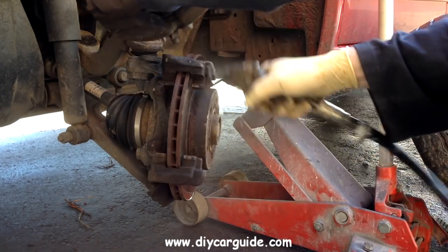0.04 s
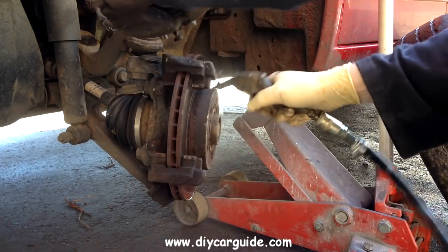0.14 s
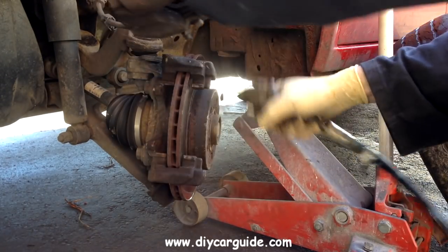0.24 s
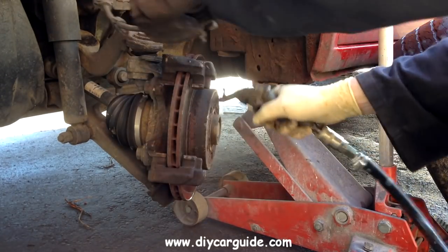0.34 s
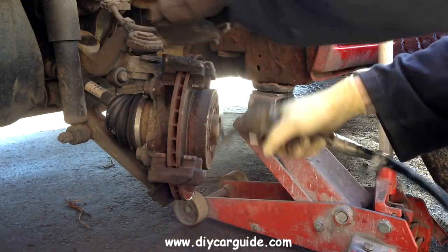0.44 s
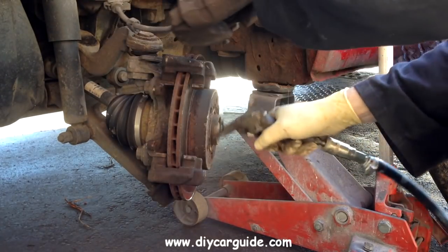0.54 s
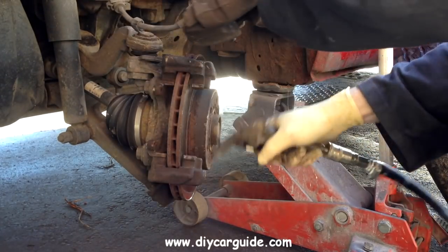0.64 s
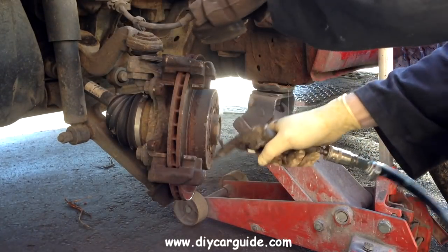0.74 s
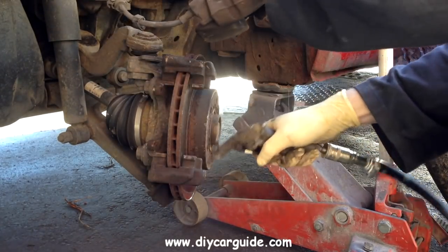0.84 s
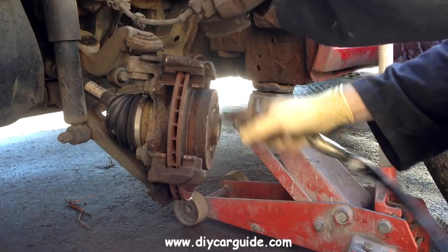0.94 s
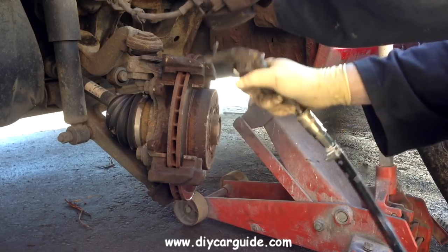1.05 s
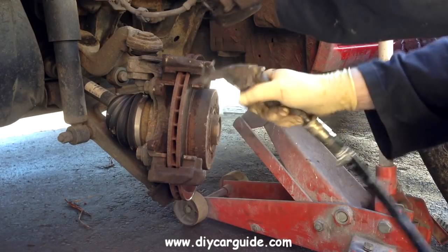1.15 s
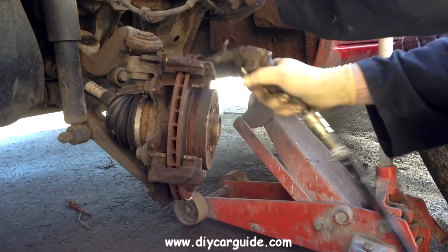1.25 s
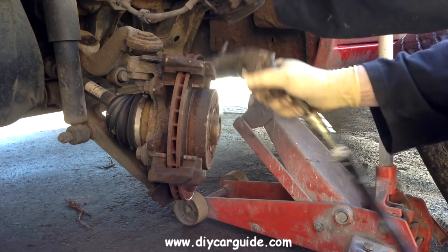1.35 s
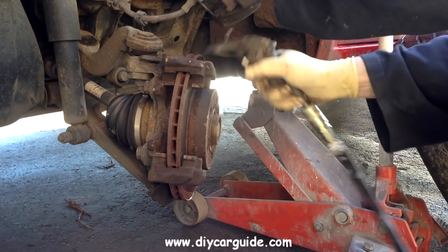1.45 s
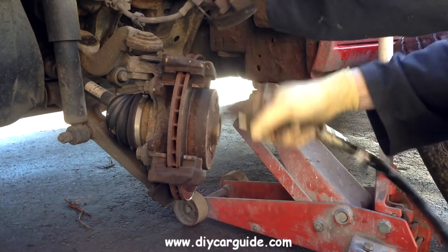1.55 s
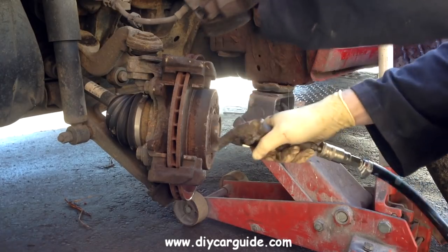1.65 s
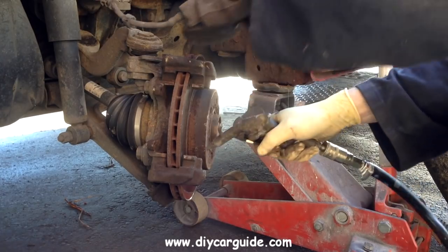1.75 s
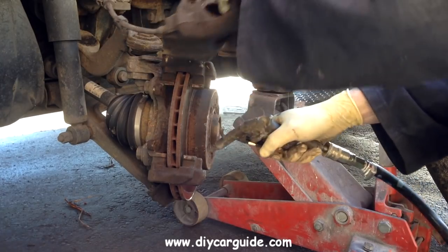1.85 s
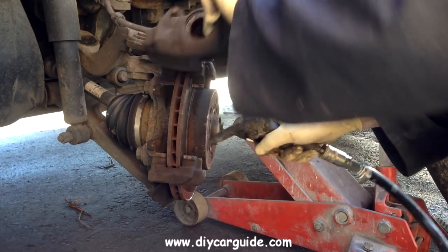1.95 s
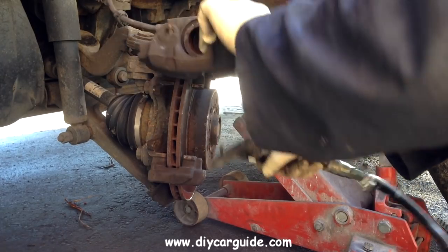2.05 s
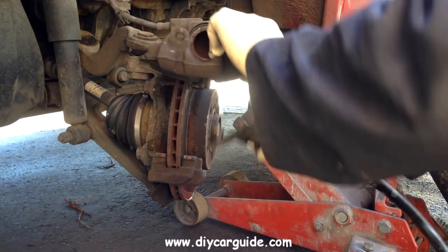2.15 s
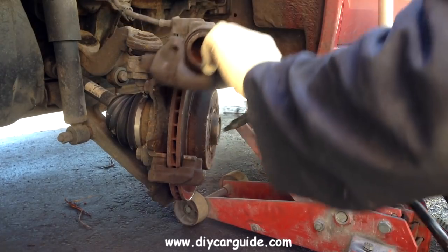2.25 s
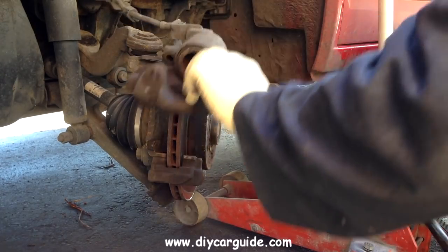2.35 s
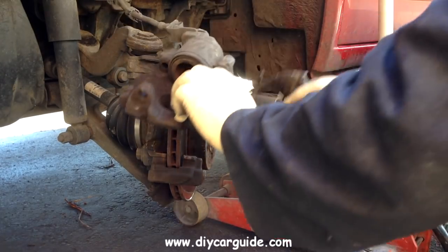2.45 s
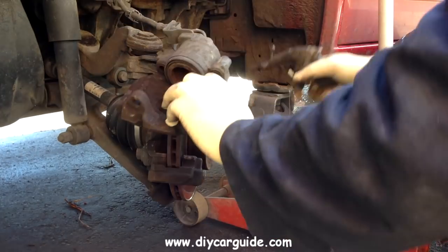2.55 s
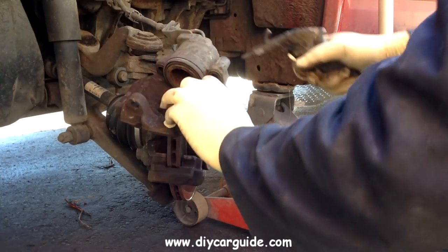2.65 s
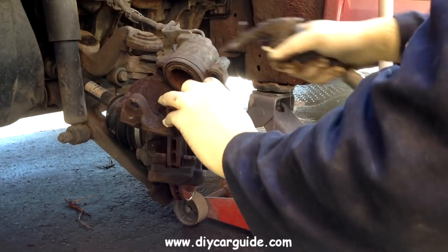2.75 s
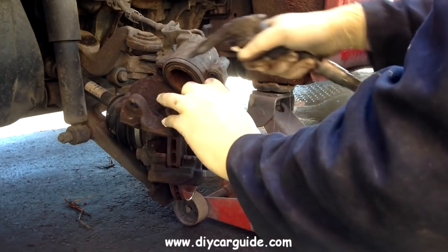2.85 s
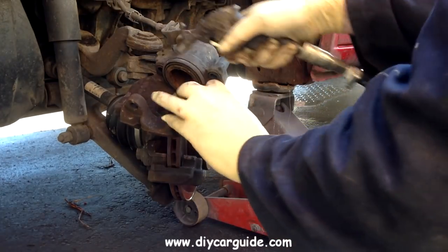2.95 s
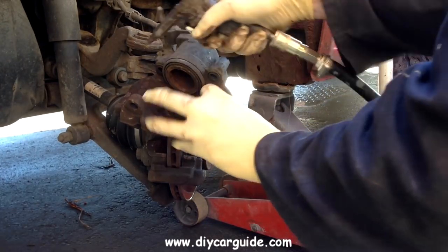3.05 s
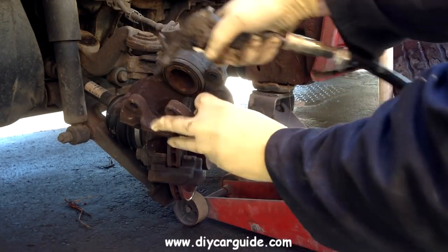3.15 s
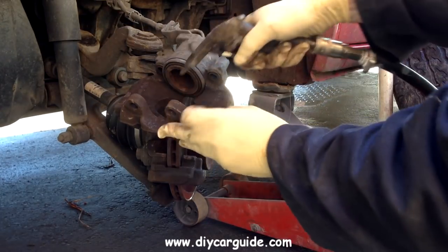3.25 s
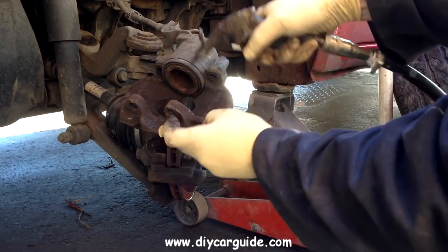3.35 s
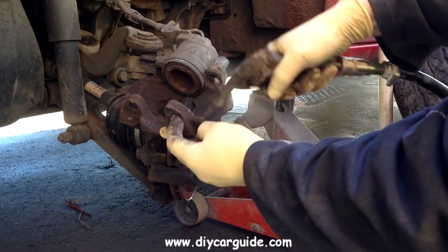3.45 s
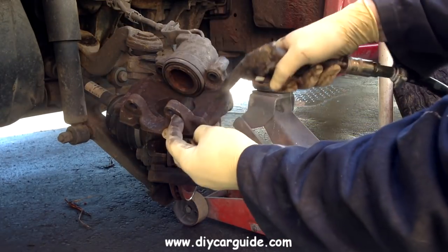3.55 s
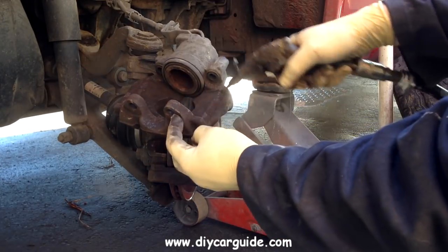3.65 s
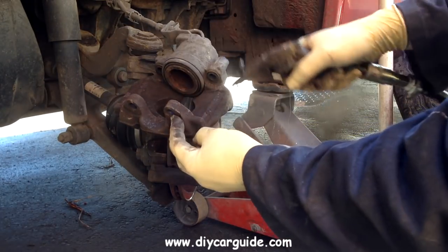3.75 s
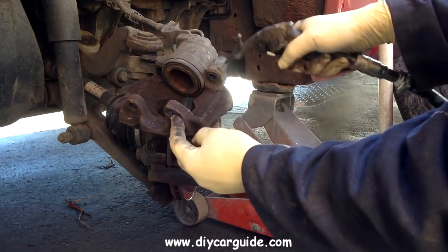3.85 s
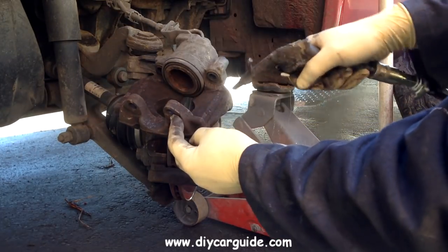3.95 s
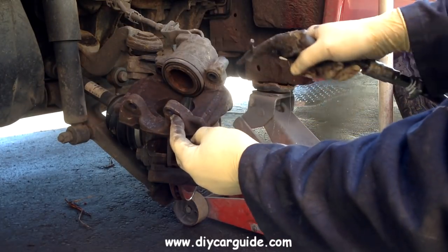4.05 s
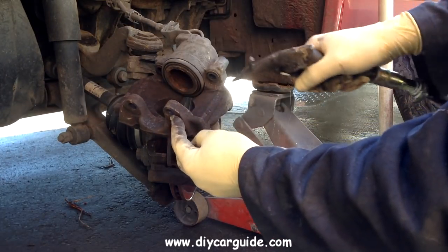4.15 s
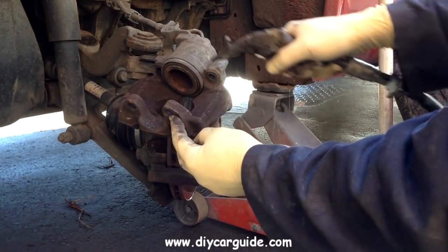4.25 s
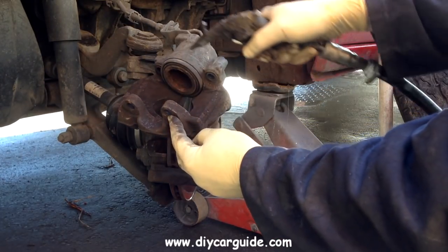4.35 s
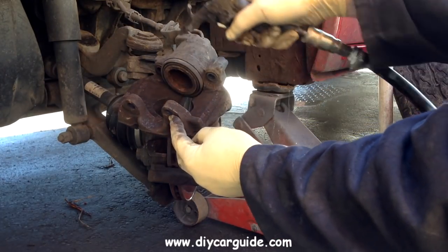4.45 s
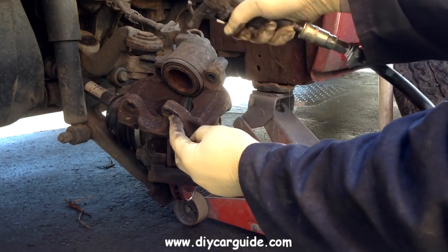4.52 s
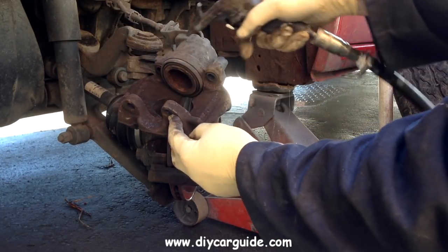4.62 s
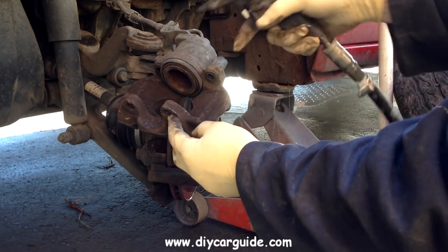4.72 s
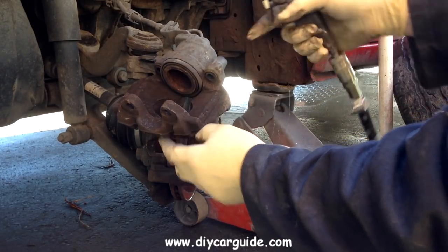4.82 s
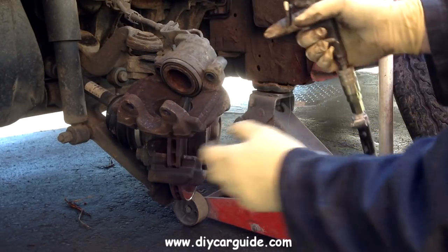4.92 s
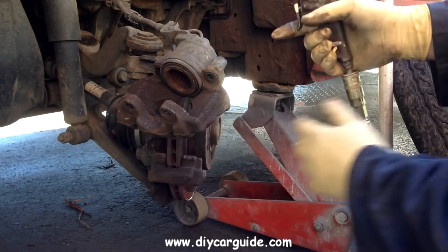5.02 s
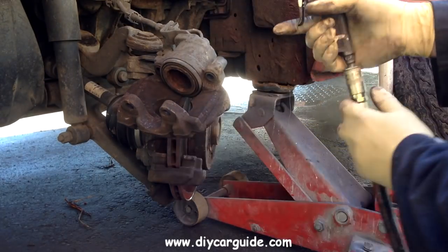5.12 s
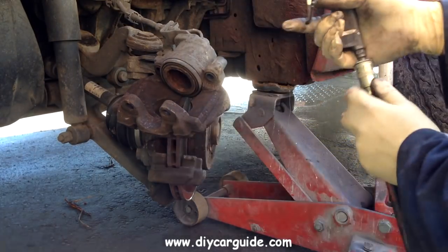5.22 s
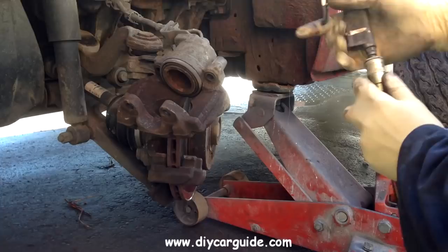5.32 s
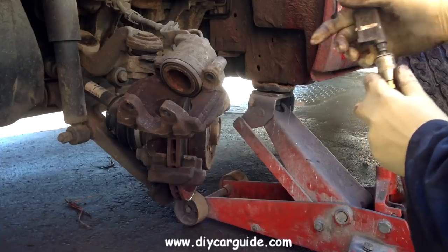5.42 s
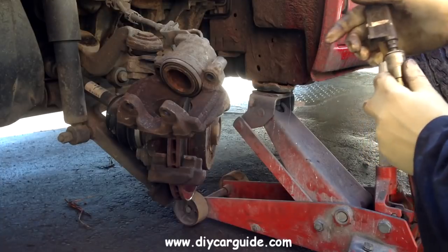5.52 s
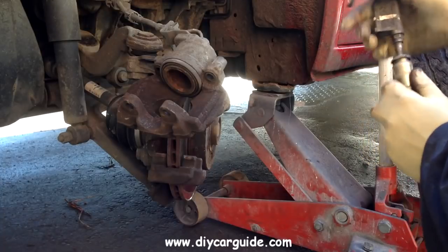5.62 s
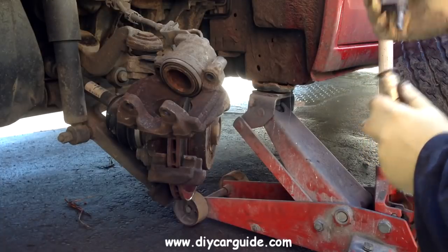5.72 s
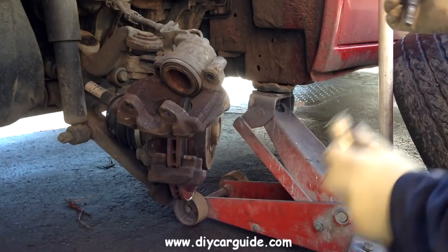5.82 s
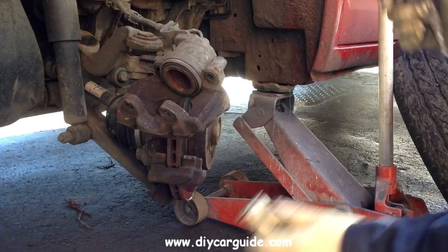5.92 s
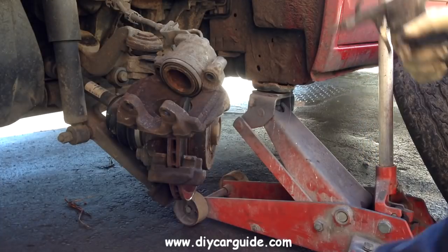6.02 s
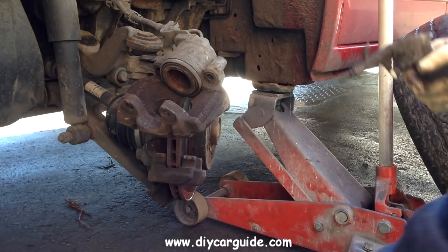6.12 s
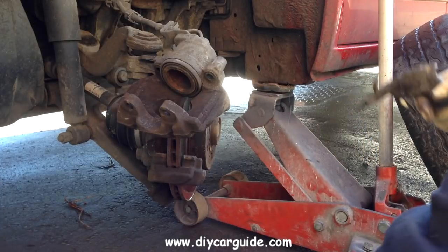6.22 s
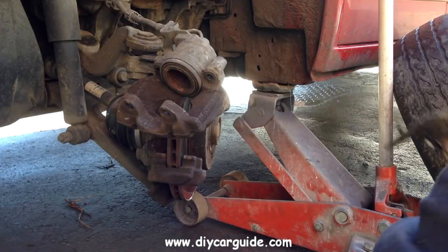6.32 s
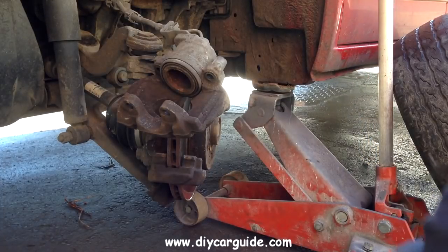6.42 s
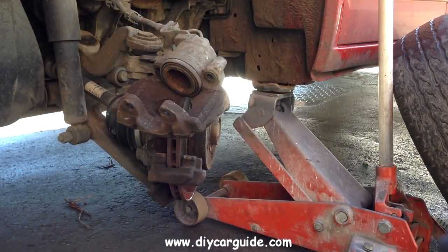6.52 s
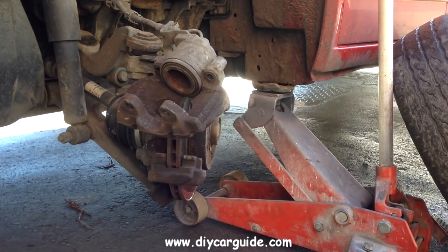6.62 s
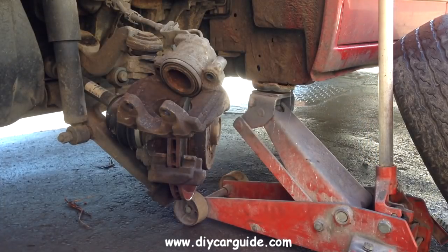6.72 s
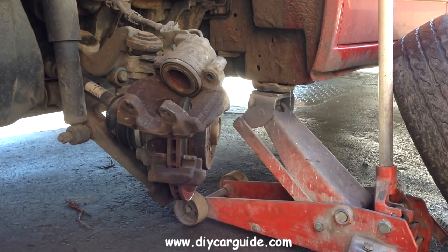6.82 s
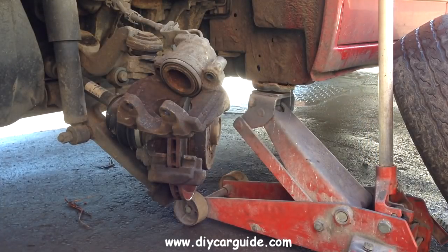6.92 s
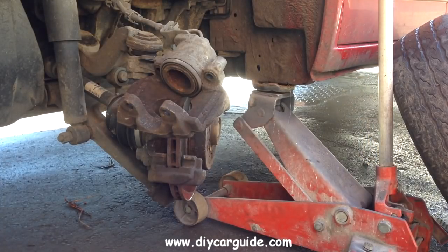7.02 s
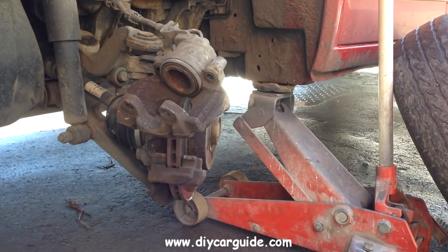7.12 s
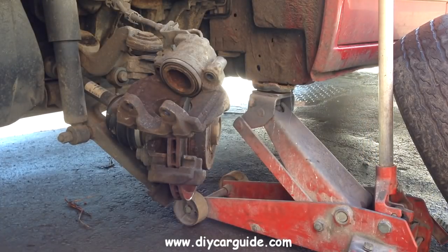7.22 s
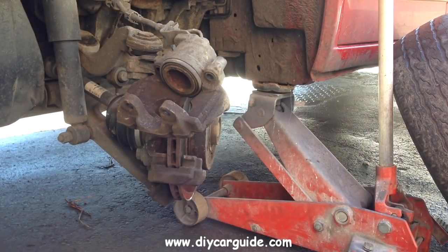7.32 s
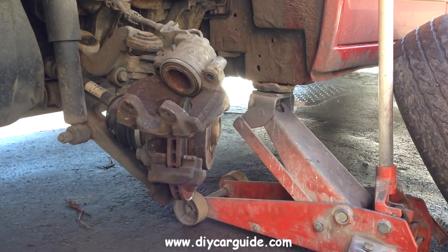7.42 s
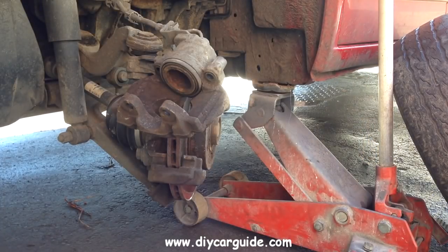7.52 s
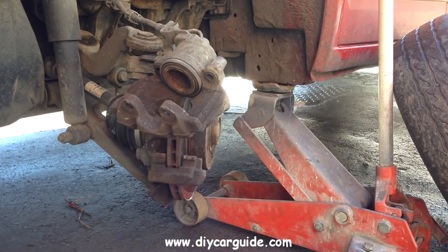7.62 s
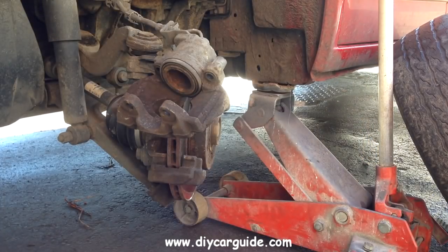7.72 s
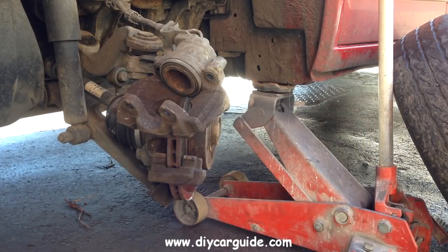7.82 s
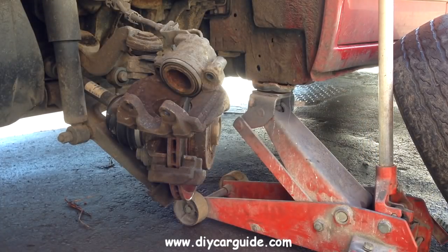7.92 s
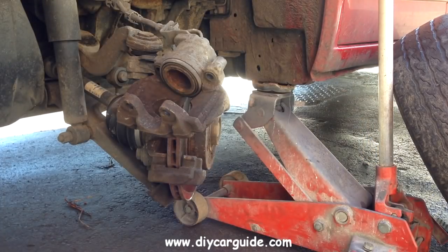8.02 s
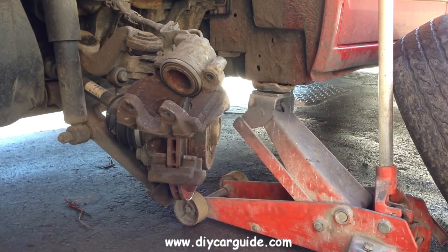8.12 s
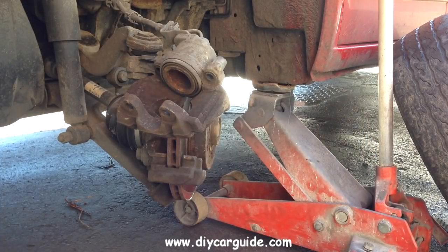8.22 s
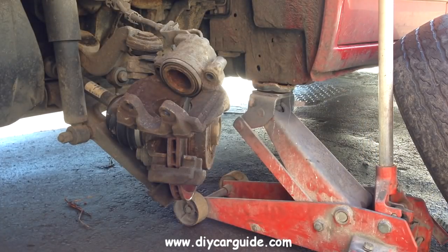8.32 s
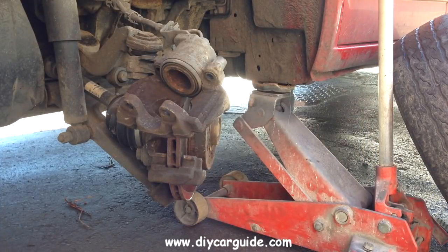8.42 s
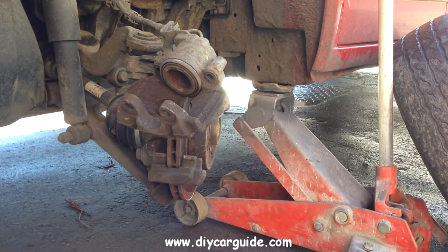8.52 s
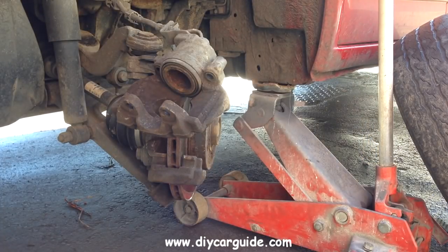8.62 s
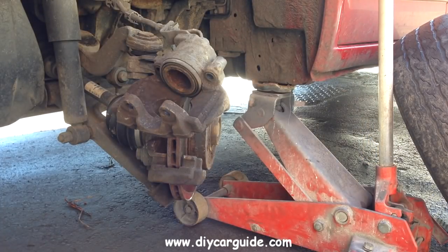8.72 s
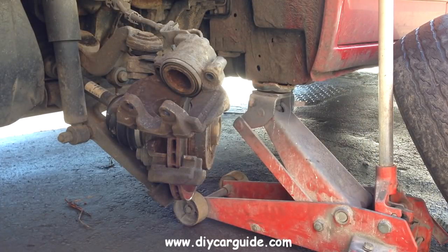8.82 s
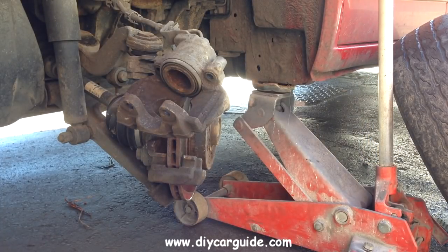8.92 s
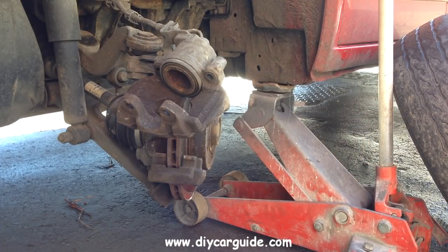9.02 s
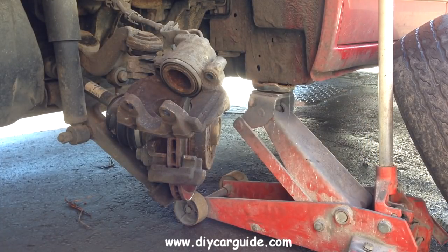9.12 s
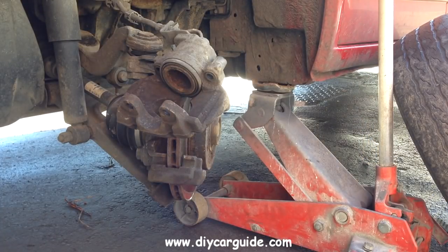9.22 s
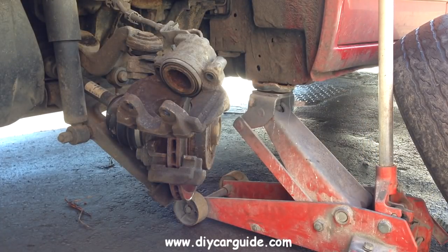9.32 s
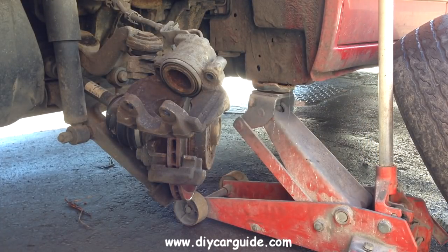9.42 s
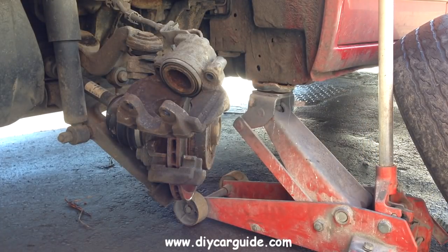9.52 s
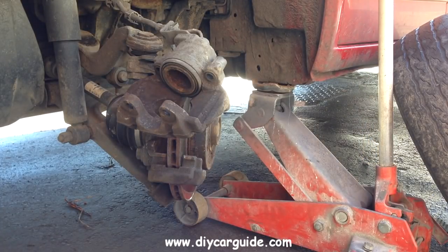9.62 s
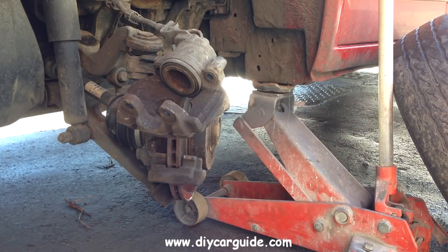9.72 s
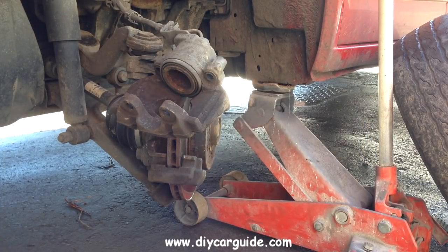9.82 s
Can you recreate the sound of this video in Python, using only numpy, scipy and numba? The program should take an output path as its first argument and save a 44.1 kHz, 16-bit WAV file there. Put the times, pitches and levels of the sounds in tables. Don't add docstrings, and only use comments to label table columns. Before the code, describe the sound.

In a garage, about a metre from the microphone, an air blow gun hisses brightly over a brake disc, flaring into rough roars and hollow whooshes on edges and cavities. Dull knocks fill a brief gap before a second blast over the caliper. The air cuts off, a compressor strains up and settles into a low drone, the hose coupler pops with a sharp burst, and the gun is laid down with metallic clicks.

```python
import sys
import numpy as np
from scipy import signal
from scipy.fft import rfft, irfft, next_fast_len
from scipy.io import wavfile
from scipy.ndimage import uniform_filter1d
from numba import njit

SR = 44100
rng = np.random.default_rng(int(sys.argv[2]) if len(sys.argv) > 2 else 0)


def dump_mix(stems):
    frames = np.atleast_2d(stems).T
    limited = np.clip(frames, -1, 1)
    pcm = np.round(limited * 32767).astype(np.int16)
    wavfile.write(sys.argv[1], SR, pcm)


def amplitude_ratio(level_db):
    exponent = np.asarray(level_db, float) / 20
    return 10 ** exponent


N = 434826
T = np.arange(N) / SR

# (open t/s, release t/s, free jet level/dB, hollows level/dB)
BLASTS = [
    (-.1, 2.384, -28, -49.5),
    (2.61, 4.69, -27, -47),
]
VALVE_OPEN_S, BLEED_DB_PER_S = 0.015, 319
# (f/Hz, level/dB per Hz)
FREE_SPECTRUM = [(290, -44.5), (500, -22), (698, -17.5), (1640, -9.5), (1870, -4), (3060, -0.5), (11300, 6),
                 (14700, 3), (16000, 2.5)]
# (middle t/s, length/s, level/dB, centre f/Hz)
BRACKET_STRIKES = [(0.028, 0.065, -28, 4890), (0.065, 0.041, -16, 4680), (0.109, 0.041, -18, 3360),
                   (0.249, 0.05, -18.5, 6600), (0.513, 0.037, -22, 2850), (0.561, 0.035, -22, 3670),
                   (0.617, 0.028, -26, 4240), (0.699, 0.053, -19.5, 3050), (0.755, 0.062, -24, 3880),
                   (0.859, 0.09, -19.5, 3880), (0.968, 0.066, -18, 5480), (1.066, 0.025, -18, 4380),
                   (1.086, 0.1, -24, 3950), (1.25, 0.03, -22, 2830), (1.26, 0.006, -21, 3500),
                   (1.295, 0.03, -21, 3400), (1.338, 0.032, -20.5, 2840), (1.36, 0.3, -28.5, 3200),
                   (1.678, 0.046, -16.5, 3500), (1.767, 0.12, -19, 5460), (1.903, 0.16, -18, 3580),
                   (1.962, 0.043, -18.5, 4400), (2.088, 0.057, -20, 3110), (2.2, 0.05, -18, 4430),
                   (2.31, 0.097, -23.5, 4400)]
# (middle t/s, length/s, level/dB, centre f/Hz)
CALIPER_STRIKES = [(2.676, 0.096, -23.5, 4200), (2.701, 0.014, -14, 4090), (2.722, 0.063, -18.5, 4760),
                   (2.815, 0.12, -20.5, 7450), (2.912, 0.014, -20, 8640), (2.925, 0.03, -27.5, 7000),
                   (3.241, 0.033, -25, 3180), (3.396, 0.058, -22, 6510), (3.404, 0.29, -34.5, 6770),
                   (3.493, 0.032, -20, 7490), (3.533, 0.024, -25.5, 7430), (3.568, 0.026, -20, 7600),
                   (3.59, 0.035, -26, 8500), (3.687, 0.042, -25, 6200), (3.771, 0.1, -21.5, 6400),
                   (3.778, 0.03, -18.5, 6270), (3.854, 0.022, -17.5, 5460), (3.92, 0.012, -20.5, 5000),
                   (3.954, 0.013, -17, 5870), (3.981, 0.066, -25.5, 5150), (4.07, 0.018, -18, 5200),
                   (4.095, 0.071, -19, 4200), (4.152, 0.028, -19.5, 6000), (4.175, 0.03, -17, 4370),
                   (4.288, 0.041, -22, 4900), (4.336, 0.14, -19, 6450), (4.452, 0.069, -21, 4440),
                   (4.52, 0.08, -27, 7000), (4.605, 0.13, -23.5, 4800), (4.607, 0.059, -16.5, 4670)]
SPRAY_DB, SPRAY_HZ, SPRAY_TILT = -4, 6000, 0.75
ROAR_DB, BUFFET_DB, BUFFET_FOLLOW = -1.5, -48.5, 0.68
# (middle t/s, length/s, level/dB)
CROSSINGS = [(0.098, 0.078, -62), (0.529, 0.077, -37.5), (0.613, 0.054, -46), (0.696, 0.034, -30.5),
             (0.872, 0.18, -39), (1.113, 0.081, -39), (1.243, 0.04, -36.5), (1.386, 0.11, -37.5),
             (1.516, 0.051, -41.5), (1.663, 0.042, -28.5), (1.888, 0.24, -48), (2.142, 0.11, -37),
             (2.316, 0.16, -37.5), (2.603, 0.21, -30), (2.919, 0.015, -26), (2.94, 0.04, -36.5),
             (3.7, 0.0073, -32.5), (3.227, 0.098, -33.5), (3.32, 0.048, -34.5), (3.411, 0.11, -31),
             (3.716, 0.038, -47), (3.839, 0.038, -28.5), (3.978, 0.023, -27.5), (4.068, 0.17, -36),
             (4.227, 0.12, -31.5), (4.275, 0.028, -23.9), (4.47, 0.063, -31.5), (4.643, 0.12, -34.5),
             (3.0, 0.11, -37.5)]
# (middle t/s, length/s, level/dB, thinning 0-1)
SHADOWS = [(0.35, 0.13, 0, 0), (1.584, 0.048, 0.5, .5), (1.2, 0.034, 2, 0.3), (1.472, 0.045, 0, 0.4),
           (2.861, 0.089, -1.5, 0.9), (2.985, 0.13, 1.4, 0.5), (3.168, 0.046, 0.5, 0.3),
           (3.52, 0.05, 1.2, .6), (3.118, 0.11, 2.5, 0.9), (3.647, 0.032, -2, 0), (3.904, 0.052, -10, 0.57),
           (4.383, 0.11, 0, 0.84)]
SHADOW_HOLLOW_RATIO = 1.4
# (f/Hz, width/Hz, level/dB)
BRACKET_MODES = [(1100, 1400, 0)]
# (f/Hz, width/Hz, level/dB)
CUP_MODES = [(1150, 760, 4), (807, 330, -13), (1900, 220, -11)]
CUP_FROM_S = 2.75
# (start t/s, length/s, f/Hz, level/dB)
HOLES = [(0.05, 0.095, 2400, -23), (0.063, 0.082, 4630, -22), (0.23, 0.059, 3900, -25),
         (1.045, 0.074, 2600, -26), (1.22, 0.21, 2470, -29), (1.65, 0.04, 2240, -21.5),
         (2.073, 0.035, 2300, -25), (2.275, 0.049, 1080, -38), (2.685, 0.028, 3600, -19.5),
         (2.747, 0.13, 1180, -43.5), (2.904, 0.011, 1360, -33.5), (3.55, 0.27, 1140, -42.5),
         (3.55, 0.12, 3350, -40), (3.183, 0.092, 2000, -34.5), (3.353, 0.088, 1120, -23),
         (3.359, 0.066, 4400, -30.5), (3.357, 0.083, 6700, -27), (3.354, 0.077, 9340, -25),
         (3.83, 0.075, 3420, -29.5), (3.93, 0.2, 3330, -37.5), (0.08, 0.06, 2900, -25.5),
         (0.83, 0.065, 3300, -29), (1.28, 0.03, 4500, -26), (2.27, 0.057, 4250, -29),
         (4.62, 0.06, 1880, -32.5), (4.44, 0.05, 1880, -33), (4.18, 0.13, 1150, -29.5),
         (4.433, 0.044, 3500, -22.5), (4.46, 0.31, 1890, -42), (4.596, 0.069, 3500, -22)]
# (middle t/s, length/s, f/Hz, level/dB)
SKIMS = [(0.02, 0.046, 2600, -37), (0.109, 0.054, 7500, -25), (0.252, 0.048, 8100, -20),
         (0.42, 0.073, 7000, -33), (0.602, 0.06, 1900, -38), (0.92, 0.04, 1600, -36.5),
         (1.068, .018, 5400, -21), (3.4, .025, 5000, -25), (1.052, .02, 12500, -22),
         (1.42, .17, 10000, -30), (1.17, .1, 10500, -32), (1.03, .03, 9000, -30),
         (1.419, 0.038, 2490, -29.5), (1.53, 0.08, 9000, -29.5), (1.702, 0.04, 8000, -19),
         (1.774, 0.053, 8200, -21.5), (1.811, 0.06, 1710, -31.5), (1.91, 0.12, 1650, -32.5),
         (2.3, 0.053, 1150, -34.5), (1.4, 0.04, 750, -41), (1.96, 0.05, 4300, -24.5),
         (2.144, 0.058, 1600, -33), (2.848, 0.093, 11000, -27), (2.908, 0.02, 11500, -24),
         (3.049, 0.076, 724, -40.5), (2.971, 0.07, 704, -41), (3.199, 0.06, 760, -37),
         (3.45, 0.062, 750, -39), (0.82, 0.03, 9000, -25.5), (0.701, 0.03, 800, -36),
         (3.39, 0.05, 12500, -31), (3.576, 0.06, 11000, -26.5), (3.74, 0.07, 12000, -28),
         (3.79, 0.05, 9000, -29), (3.886, 0.0095, 5500, -26.5), (4.132, 0.04, 700, -38.5),
         (4.3, 0.06, 12000, -25), (4.371, 0.094, 8500, -23), (4.596, 0.069, 10500, -20),
         (4.658, 0.066, 8000, -28.5)]
HOLE_Q, SKIM_Q = 7.0, 2.6
# (delay/ms, gain)
ECHOES = [(.86, .13), (1.37, -.14), (2.65, .22), (3.83, .08), (5.9, -.1), (8.3, .1)]
ROOM_T60_S, ROOM_DB = 0.2, -18.5
LATE_T60_S, LATE_DB = 0.5, -32

# (t/s, level/dB)
HUM_LEVEL = [(0, -83), (.2, -51), (1.1, -49.5), (3.3, -51), (3.55, -70), (3.8, -49.5), (4.9, -50),
             (5.3, -46.5), (6.5, -42), (9.86, -53.5)]
HUM_HZ = 112.6
# (f/Hz, level/dB per Hz)
RUMBLE_SPECTRUM = [(15, -47.5), (25, 1), (129, -3.5), (162, -4), (287, -6.5), (330, -25), (430, -31.5),
                   (730, -120)]
# (f/Hz, level/dB per Hz)
AIR_SPECTRUM = [(180, -33.5), (300, -2.5), (1200, -11), (2930, -13), (12100, -26), (14500, -27.5),
                (16000, -34)]
RUMBLE_DB, RUMBLE_LIFT_DB, AIR_DB, AIR_LIFT_DB = -55, 5, -57.5, 5
RECOVER_FROM_S, RECOVER_S = 5.0, .2

# (t/s, peak level/dB, f/Hz, T60/s)
THUMPS = [(1.491, -23.5, 174, 0.1), (1.618, -37, 229, 0.17), (1.973, -26, 127.5, 0.3),
          (2.095, -28, 110, 0.18), (2.191, -30.5, 169, 0.16), (2.377, -23, 122.2, 0.35),
          (2.505, -31, 117, 0.15), (2.68, -30, 238, 0.11), (5.259, -30, 60.3, 0.2), (5.29, -25, 130, 0.12),
          (5.345, -20, 150, 0.06), (5.656, -17, 125, 0.13), (6.799, -24, 500, .03)]

# (start t/s, end t/s, from f/Hz, to f/Hz, level/dB)
SINGING = [(4.74, 4.84, 870, 830, -58), (4.9, 5.0, 680, 670, -55), (5.07, 5.32, 655, 675, -44),
           (5.2, 5.38, 680, 720, -54), (5.2, 5.41, 340, 375, -36.5), (4.88, 5.2, 190, 200, -54),
           (4.94, 4.99, 970, 920, -54), (5.17, 5.26, 800, 830, -55), (5.12, 5.4, 110, 215, -50),
           (5.38, 5.47, 395, 385, -44), (5.44, 5.66, 900, 880, -52)]
# (t/s, clatter level/dB)
PULL_UP = [(4.8, -69), (4.948, -60), (4.956, -51.5), (5.044, -54.5), (5.122, -51.5), (5.228, -48.5),
           (5.38, -59)]
# (t/s, level/dB)
DRONE = [(5.385, -35), (5.43, -38.5), (5.6, -42), (6.09, -39.5), (7.81, -36.5), (8.07, -36), (9.86, -36)]
# (t/s, turns f/Hz)
CRANK = [(5.3, 19.2), (5.6, 19.14), (5.9, 19.06), (8.0, 19.046), (9.86, 19.04)]
STROKES = [(1, -27), (2, -21), (3, -13), (4, -27), (5, -8.5), (6, -11), (7, -18), (8, -16), (9, 2),
           (10, -5), (11, -26), (12, -5.5), (13, -19.5), (14, -17.5), (15, -15.5), (16, -13.5), (17, -21.5),
           (18, -26), (19, -28), (20, -21), (21, -12.5), (22, -22), (23, -25), (24, -16.5), (25, -19.5),
           (26, -7.5), (27, -12.5), (28, -19.5), (2.5, -25), (3.5, -26), (7.5, -25), (9.5, -18.5),
           (10.5, -20.5), (13.5, -19.5), (15.5, -17.5), (16.5, -25), (18.5, -24), (21.5, -26),
           (25.5, -17.5), (26.5, -15.5), (27.5, -22.5)]
# (f/Hz, level/dB)
WHINES = [(1087, -59), (1670, -63), (1217, -57), (1348, -54), (1373, -53), (1507, -55.5), (2093, -56.5),
          (3220, -59), (4350, -67), (5125, -65.5)]
# (f/Hz, level/dB per Hz)
CLATTER_SPECTRUM = [(18, -55), (30, -34), (194, -10), (287, -18), (345, -9), (512, -14), (866, -15),
                    (988, -13), (1160, -19), (1350, -19), (1910, -22), (8980, -36), (13700, -47),
                    (16000, -72)]
# (f/Hz, width/Hz, level/dB)
CASING_MODES = [(1380, 50, -27), (1473, 35, -5.0), (2090, 29, -32), (3297, 54, -16.5), (5120, 16, -12),
                (5950, 38, -27), (8680, 120, -14), (2440, 180, -24), (3170, 89, -26), (3950, 110, -15.5),
                (5840, 45, -22), (13300, 200, -23), (12000, 200, -27)]
CLATTER_DB, CLATTER_FOLLOW = -55, 0.69

# (t/s, peak level/dB, crack centre f/Hz, crack T60/s, ring f/Hz)
CLICKS = [(5.657, -11.5, 420, .015, 405), (4.904, -46, 6000, .03, 3100), (5.6566, -11.5, 4700, 0.019, 5000),
          (5.6625, -9.5, 2100, 0.022, 1110), (5.658, -9.5, 4620, .006, 4580),
          (5.663, -14.5, 1300, 0.041, 1370), (5.676, -20, 5000, .02, 3000),
          (6.037, -34.5, 6200, 0.039, 5420), (7.79, -46, 10500, .02, 10600), (7.65, -50, 8000, .02, 7400),
          (6.8, -11.5, 8200, .017, 9330), (6.7988, -17, 1500, 0.0079, 3060),
          (6.805, -20, 7500, 0.049, 8500), (7.293, -36.5, 6800, 0.1, 5000), (7.294, -20, 1200, 0.01, 1130),
          (7.2965, -29, 8500, .02, 7300), (6.845, -38, 5000, .02, 9400), (6.789, -34, 2500, .01, 3000),
          (6.799, -19.5, 870, 0.012, 1330), (6.801, -29, 12000, .02, 10900),
          (7.297, -37, 14000, .015, 8500), (7.372, -43, 9200, .03, 8700), (5.6615, -12, 5500, .012, 2400)]
RING_DB, RING_T60_S, TUBE_HZ, TUBE_T60_S = -14.5, 0.039, 9000, .09
# t/s, length/s, level/dB, centre f/Hz
POP = (5.6542, .011, -17.5, 10000)

TOP_HZ, SHELF_HZ, SHELF_DB, BOTTOM_HZ, EDGE_HZ = 15770, 15300, -13, 55, 40


def noise(n=N):
    return rng.standard_normal(n)


def unit(x):
    return x / np.sqrt(np.mean(x ** 2))


def columns(rows):
    s, *cols = np.transpose(rows)
    return [np.interp(T, s, c) for c in cols]


@njit
def svf(x, hz, q):
    y, b, l = np.empty(len(x)), 0., 0.
    for i in range(len(x)):
        g = np.tan(np.pi * hz[i] / SR)
        v = (b + g * (x[i] - l)) / (1 + g * (g + 1 / q))
        b, l, y[i] = 2 * v - b, l + 2 * g * v, v / q
    return y


def band(x, hz, width_hz):
    centre_hz = np.full(len(x), min(1. * hz, .4 * SR))
    return svf(x, centre_hz, max(hz / width_hz, .2))


def walk(rate_hz):
    k = int(SR / rate_hz)
    held = np.repeat(noise(N // k + 1), k)
    return 1.26 * uniform_filter1d(held, k)[:N]


def coloured(points, white=None):
    hz, db = np.transpose(points)
    f = np.maximum(np.arange(N // 2 + 1) * SR / N, 1)
    white = noise() if white is None else white
    return unit(irfft(rfft(white) * amplitude_ratio(np.interp(np.log(f), np.log(hz), db)), N))


def resonant(modes, widen=1.):
    air = noise()
    return unit(sum(amplitude_ratio(db) * band(air, hz, widen * width_hz) for hz, width_hz, db in modes))


def dwell(s, length_s):
    return np.exp(-np.abs((T - s) / (length_s / 2)) ** 3)


def thinning():
    return np.clip(sum(share * dwell(s, length_s) for s, length_s, _, share in SHADOWS), 0, 1)


def aim():
    valve_db, free, cup = -200, 0, 0
    for t0, t1, free_db, cup_db in BLASTS:
        rising_db = 20 * np.log10(np.clip((T - t0) / VALVE_OPEN_S, 1e-5, 1) ** 2)
        valve_db = np.maximum(valve_db, rising_db - BLEED_DB_PER_S * np.maximum(T - t1, 0))
        free = np.where(T > t0, amplitude_ratio(2 * free_db), free)
        cup = np.where(T > t0, amplitude_ratio(2 * cup_db), cup)
    roar = amplitude_ratio(2 * -45)
    pitch = roar * np.log(SPRAY_HZ)
    for s, length_s, db, hz in BRACKET_STRIKES + CALIPER_STRIKES:
        power = amplitude_ratio(2 * db) * dwell(s, length_s)
        roar = roar + power
        pitch = pitch + power * np.log(hz)
        free = free + amplitude_ratio(2 * SPRAY_DB) * (hz / SPRAY_HZ) ** SPRAY_TILT * power
    crossing = sum(amplitude_ratio(2 * db) * dwell(s, length_s) for s, length_s, db in CROSSINGS)
    shadow_db = sum(db * dwell(s, length_s) for s, length_s, db, _ in SHADOWS)
    cup_db = 10 * np.log10(cup + crossing) + SHADOW_HOLLOW_RATIO * shadow_db - 8 * thinning()
    buffet_db = BUFFET_DB + BUFFET_FOLLOW * (cup_db + 41)
    open_db = valve_db + shadow_db
    free_db = 10 * np.log10(free) + open_db
    strike_db = 10 * np.log10(roar) + ROAR_DB + open_db
    return free_db, strike_db, np.exp(pitch / roar), cup_db + valve_db, buffet_db + valve_db


def free_hiss(free_db, eddies):
    hiss = amplitude_ratio(free_db + 1.0 + 0.58 * eddies) * coloured(FREE_SPECTRUM)
    return hiss - thinning() * band(hiss, 2500, 5500)


def strike_roar(free_db, strike_db, strike_hz, eddies):
    extra = np.sqrt(np.maximum(amplitude_ratio(2 * strike_db) - 0.21 * amplitude_ratio(2 * free_db), 0))
    centre_hz = np.clip(strike_hz * (1 + .05 * walk(30)), 1500, 9000)
    roar = svf(svf(noise(), centre_hz, 0.64), centre_hz, 0.61)
    for ratio in (.65, 1.0, 1.5):
        patch_hz = np.clip(ratio * centre_hz * (1 + .1 * walk(12)), 1000, 14000)
        roar += amplitude_ratio(-2 + 3.5 * walk(30)) * svf(noise(), patch_hz, 8.)
    roar /= np.sqrt(uniform_filter1d(roar ** 2, size=4000))
    return extra * amplitude_ratio(1.3 * eddies + .8 * walk(60)) * roar


def hollow_ring(cup_db, eddies):
    hollow = np.where(T > CUP_FROM_S, resonant(CUP_MODES), resonant(BRACKET_MODES))
    flutter = amplitude_ratio(1.5 * eddies + 1.5 * walk(40))
    return amplitude_ratio(cup_db) * flutter * unit(band(hollow, 1150, 1300))


def low_buffet(buffet_db):
    low = unit(band(band(noise(), 550, 960), 480, 1200))
    return amplitude_ratio(buffet_db + 2.0 * walk(30)) * low


def hole_rings(eddies):
    out = np.zeros(N)
    sliding = 1 + .05 * walk(25)
    for s, length_s, hz, db in HOLES:
        near = slice(int(s * SR), int((s + length_s) * SR))
        ring_hz = hz * sliding[near.start:][:SR // 2]
        air = svf(noise(SR // 2), ring_hz, HOLE_Q)
        ring = unit(band(air, hz, 2 * hz / HOLE_Q))[:len(T[near])]
        out[near] += amplitude_ratio(db + 2 * eddies[near]) * np.sqrt(np.hanning(len(ring))) * ring
    return out


def skim_rushes(eddies):
    out = np.zeros(N)
    for s, length_s, hz, db in SKIMS:
        near = slice(max(int((s - length_s) * SR), 0), int((s + length_s) * SR))
        rush = band(noise(SR // 2), hz, hz / SKIM_Q)
        rush = unit(band(rush, hz, 2 * hz / SKIM_Q))[:len(T[near])]
        out[near] += amplitude_ratio(db + 1.5 * eddies[near]) * dwell(s, length_s)[near] * rush
    return out


def jet():
    free_db, strike_db, strike_hz, cup_db, buffet_db = aim()
    eddies = walk(90)
    out = free_hiss(free_db, eddies) + strike_roar(free_db, strike_db, strike_hz, eddies)
    out += hollow_ring(cup_db, eddies) + low_buffet(buffet_db)
    return out + hole_rings(eddies) + skim_rushes(eddies)


def garage():
    lift = 1 - np.exp(-np.maximum(T - RECOVER_FROM_S, 0) / RECOVER_S)
    hum = np.sqrt(2) * np.sin(2 * np.pi * np.cumsum(HUM_HZ * (1 + 0.0096 * walk(9))) / SR)
    hum_db = columns(HUM_LEVEL)[0] - 7.0 + 2.0 * walk(4.6)
    rumble_db = RUMBLE_DB + RUMBLE_LIFT_DB * lift + 2 + 2.7 * walk(5.6)
    air_db = AIR_DB - 1.5 + AIR_LIFT_DB * lift + 0.4 * walk(7.0)
    return amplitude_ratio(hum_db) * hum + amplitude_ratio(rumble_db) * coloured(RUMBLE_SPECTRUM) + amplitude_ratio(air_db) * coloured(AIR_SPECTRUM)


def thumps():
    out, t = np.zeros(N + SR), T[:SR // 2]
    for s, db, hz, t60_s in THUMPS:
        body = np.sin(2 * np.pi * hz * t)
        body += 0.54 * np.sin(2 * np.pi * 1.42 * hz * t)
        body += 0.43 * np.sin(2 * np.pi * 0.52 * hz * t)
        onset = 1 - np.exp(-t / 0.0013)
        out[int(s * SR):][:len(t)] += amplitude_ratio(db - 8.0 - 60 * t / t60_s) * onset * body
    return out[:N]


def part_songs():
    out = np.zeros(N)
    for t0, t1, hz0, hz1, db in SINGING:
        way = np.clip((T - t0) / (t1 - t0), 0, 1)
        hz = (hz0 + (hz1 - hz0) * way) * (1 + .012 * walk(70))
        tone = np.sin(2 * np.pi * np.cumsum(hz) / SR)
        out += amplitude_ratio(db + 3 * walk(45)) * np.sqrt(np.sin(np.pi * way) + 1e-12) * tone
    return out


def stroke_lines(turn, since_s):
    lines = 0
    for k, db in STROKES[1:]:
        if k in (3, 9):
            settled = np.clip(since_s / .04 - .5, 0, 1)
        else:
            settled = np.minimum(since_s / (.25 + .012 * k), 1) ** 1.3
        turned = -2 if k % 1 else np.pi / 2 * (k < 7.5) + (3 - .8 * (k - 13)) * (k > 12.5)
        lag = 1.75 * k + turned + .05 * noise(None)
        if k >= 24:
            lag = .5 + 6.1 * (k - 26) - 1.6 * (k - 26) ** 2
        lines = lines + settled * amplitude_ratio(db + .5 * walk(7)) * np.cos(2 * k * turn + lag)
    return lines


def valve_clatter(turn):
    one_turn = noise(2316)
    repeating = one_turn[(turn / (2 * np.pi) % 1 * len(one_turn)).astype(int)]
    clatter = coloured(CLATTER_SPECTRUM, noise() + 0.25 * repeating)
    clatter += amplitude_ratio(-13.5) * resonant(CASING_MODES, widen=1.4)
    panels = sum(amplitude_ratio(-2 + 3.5 * walk(20)) * band(clatter, hz, 220) for hz in (1500, 2100, 2450, 2650, 3200))
    return clatter + panels


def motor_whines():
    return sum(amplitude_ratio(db + 46.5 + 2.5 * walk(25)) * np.sin(2 * np.pi * hz * T + 2.0 * walk(18))
               for hz, db in WHINES)


def compressor():
    drone_db = columns(DRONE)[0]
    clatter_db = CLATTER_DB + CLATTER_FOLLOW * (drone_db + 39.5)
    turn = 2 * np.pi * np.cumsum(columns(CRANK)[0] * (1 + .0004 * walk(4))) / SR - 1.4
    since_s = np.maximum(T - DRONE[0][0] + .02, 0)
    clatter = valve_clatter(turn)
    dull = unit(band(band(clatter, 500, 900), 600, 1100))
    pulling = (T > PULL_UP[0][0]) * np.clip(1 - since_s / .2, 0, 1) * dull
    puffs = 1 + .15 * np.cos(2 * turn) + .12 * np.cos(turn)
    running = np.clip((T - 4.98) / .42, 0, 1) ** 2 * puffs * clatter
    out = part_songs() + amplitude_ratio(columns(PULL_UP)[0] - 0.5) * pulling
    out += amplitude_ratio(drone_db + 2.0) * stroke_lines(turn, since_s) + amplitude_ratio(clatter_db + 7.5) * running
    return out + amplitude_ratio(clatter_db + 5.5) * np.minimum(since_s / 0.22, 1) * motor_whines()


def clicks():
    out, t = np.zeros(N + SR), T[:SR // 2]
    for s, db, hz, t60_s, ring_hz in CLICKS:
        crack = unit(band(band(noise(len(t)), hz, 1.2 * hz), hz, 3 * hz))
        ring = 1.87 * amplitude_ratio(-900 * t) * np.sin(2 * np.pi * 1.017 * ring_hz * t)
        ring += np.sin(2 * np.pi * 0.997 * ring_hz * t)
        ring += 0.31 * np.sin(2 * np.pi * 0.95 * ring_hz * t)
        ring_t60_s = TUBE_T60_S if abs(ring_hz - TUBE_HZ) < 600 else RING_T60_S
        click = amplitude_ratio(db - 6 - 60 * t / t60_s) * crack + amplitude_ratio(db + RING_DB - 60 * t / ring_t60_s) * ring
        out[int(s * SR):][:len(t)] += click
    return out[:N]


def coupler_pop():
    out, t = np.zeros(N), T[:SR // 2]
    s, length_s, db, hz = POP
    blast = np.clip(t / 0.0024, .3, 1) * amplitude_ratio(-60 * np.maximum(t - length_s, 0) / 0.019)
    out[int(s * SR):][:len(t)] += amplitude_ratio(db) * blast * unit(band(noise(len(t)), hz, 3.2 * hz))
    return out


def reverb(near, hz, width_hz, t60_s, gap_s):
    t = T[:SR // 2]
    tail = band(noise(len(t)), hz, width_hz) * amplitude_ratio(-60 * t / t60_s) * (t > gap_s)
    return signal.fftconvolve(near, tail / np.sqrt(np.sum(tail ** 2)))[:N]


def scene():
    near = jet()
    dull = band(near, 2000, 3500)
    near = near + sum(gain * np.roll(dull, int(round(ms * SR / 1000))) for ms, gain in ECHOES)
    near = near + thumps() + clicks() + coupler_pop()
    room = reverb(near, 1670, 6800, ROOM_T60_S, .006)
    late = reverb(near, 1300, 2500, LATE_T60_S, .03)
    mono = near + amplitude_ratio(ROOM_DB) * room + amplitude_ratio(LATE_DB) * late + compressor() + garage()
    return np.array([mono, mono])


def top_cut(x):
    return signal.sosfilt(signal.butter(12, 16630, fs=SR, output="sos"), x)


def record(dry):
    dry = signal.sosfilt(signal.butter(2, BOTTOM_HZ, "high", fs=SR, output="sos"), dry)
    dry = np.tanh(dry / 1.4) * 1.4
    size = next_fast_len(N + SR // 2)
    hz = np.arange(size // 2 + 1) * SR / size
    above = lambda edge_hz: (1 + np.tanh((hz - edge_hz) / EDGE_HZ)) / 2
    response = amplitude_ratio(SHELF_DB * above(SHELF_HZ)) * (1 - above(TOP_HZ))
    mix = irfft(rfft(dry, size) * response, size)[:, :N]
    return top_cut(mix)


dry = scene()
out = record(dry)
dump_mix(out)
```